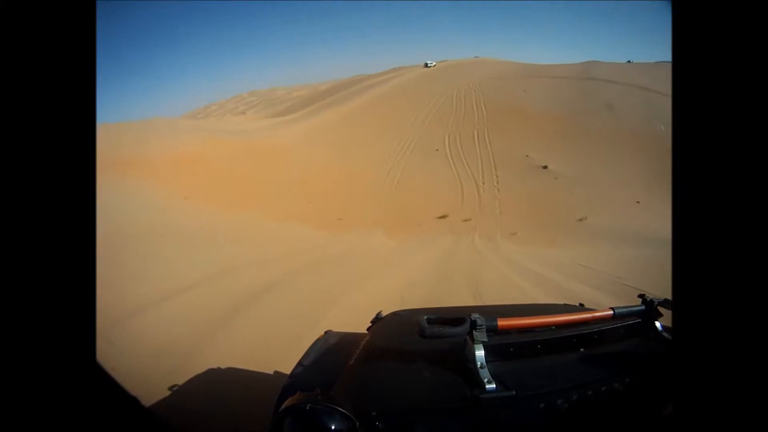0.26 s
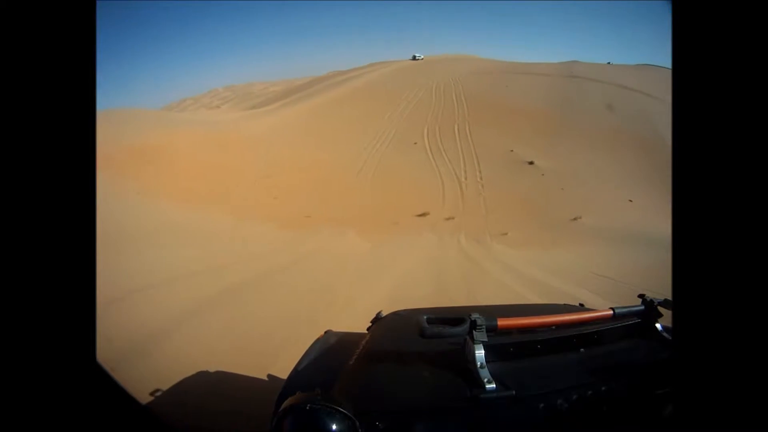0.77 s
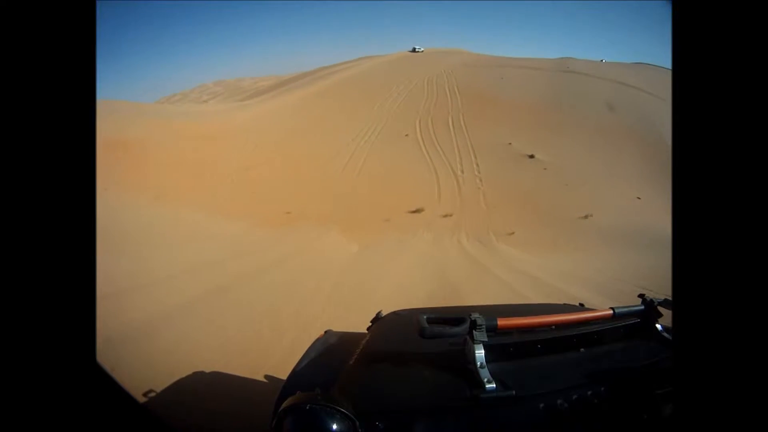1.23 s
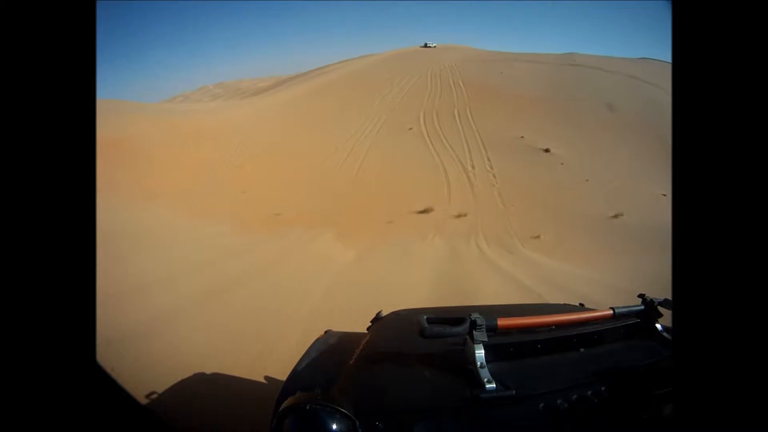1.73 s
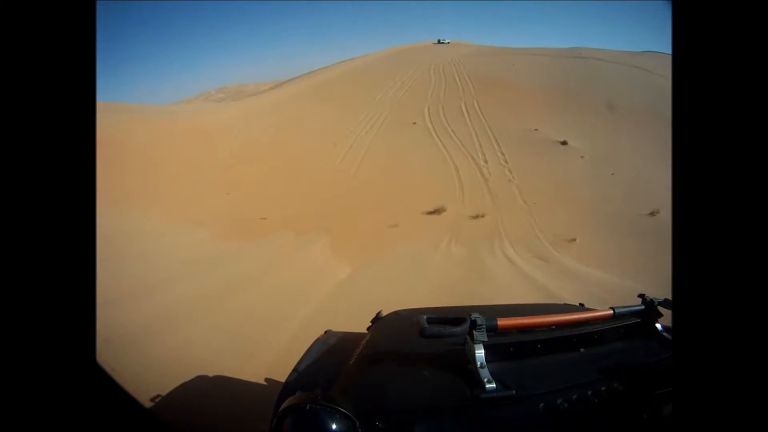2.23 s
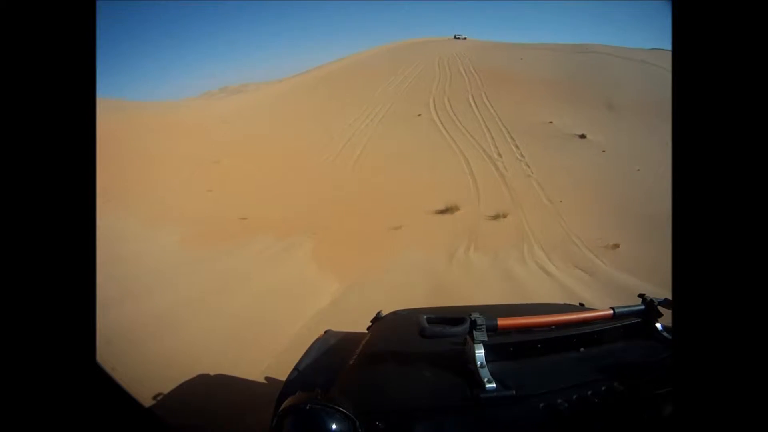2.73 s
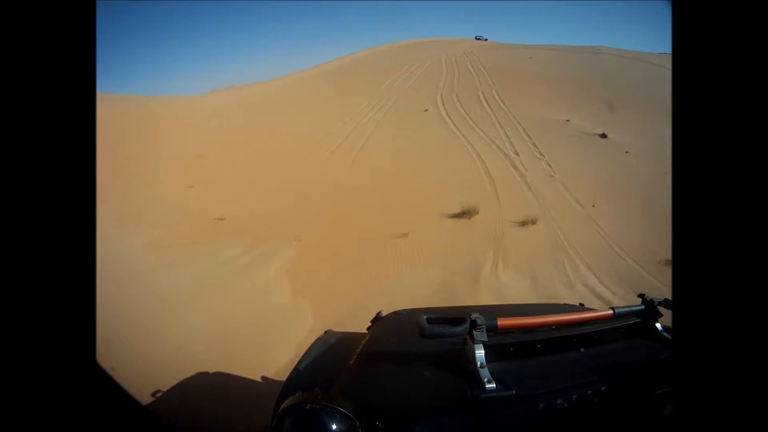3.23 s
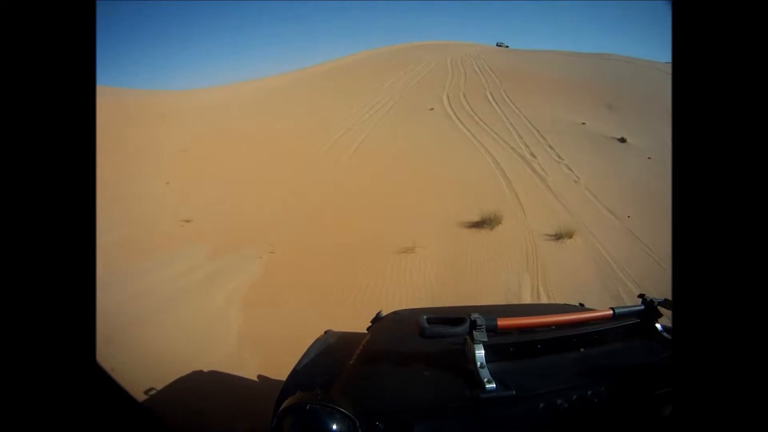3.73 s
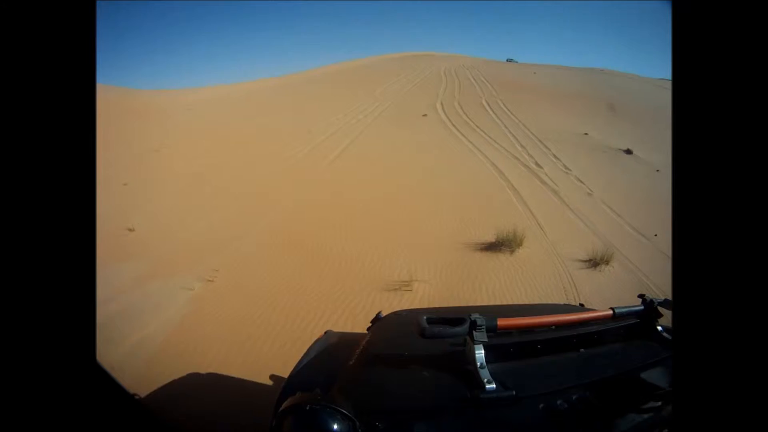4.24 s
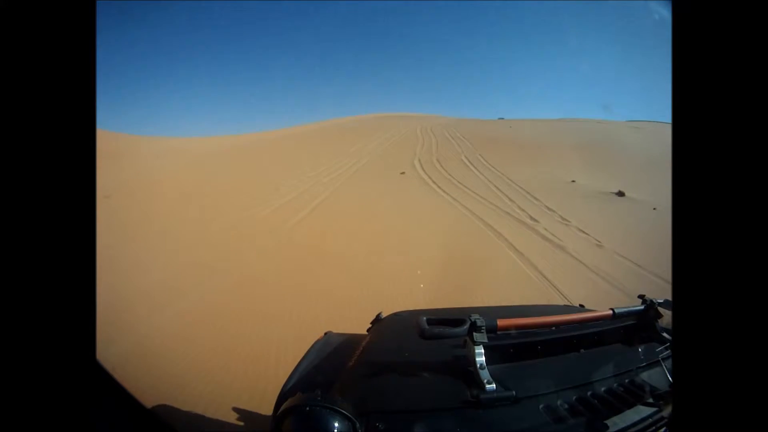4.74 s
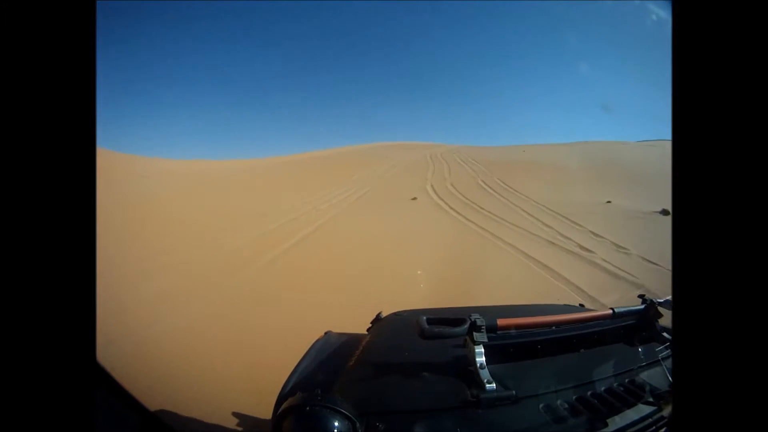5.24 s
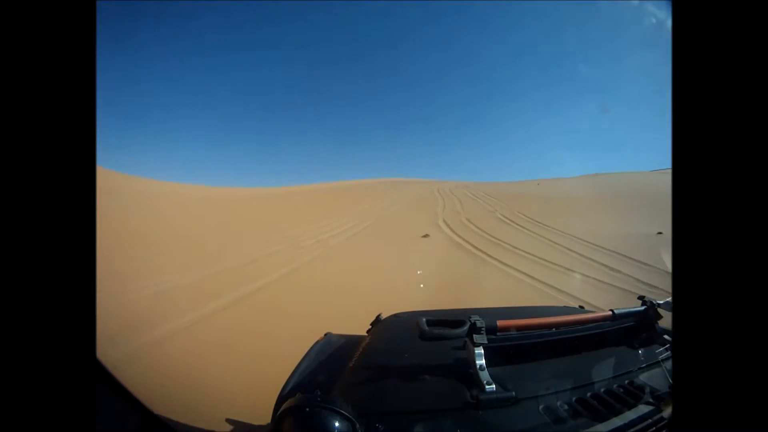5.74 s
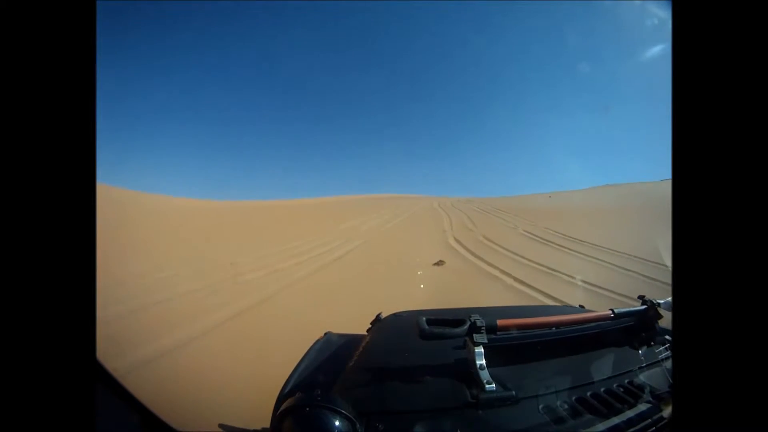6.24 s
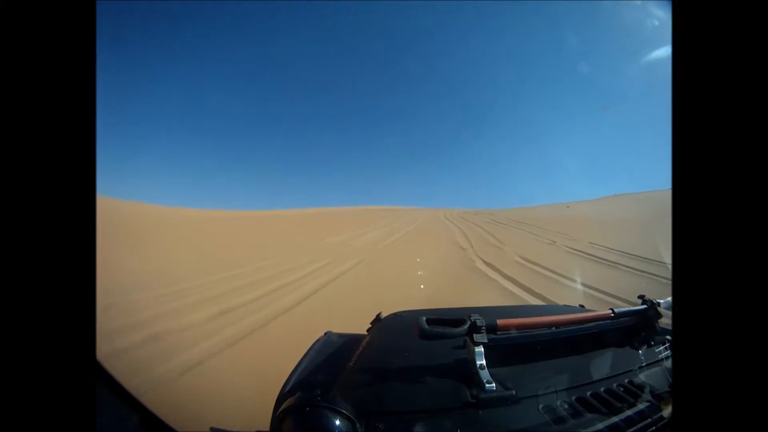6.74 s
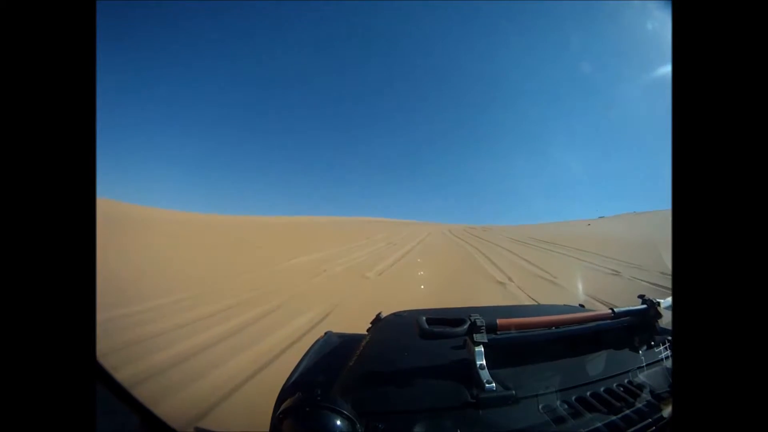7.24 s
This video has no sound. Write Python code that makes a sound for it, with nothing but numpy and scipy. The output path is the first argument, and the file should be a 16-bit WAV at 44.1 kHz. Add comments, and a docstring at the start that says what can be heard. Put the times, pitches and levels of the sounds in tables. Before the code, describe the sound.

A body-mounted microphone on an off-road vehicle catches muffled sand rumble, faint hiss and low wind thuds. A light engine hum wavers underneath. After about four seconds the six-cylinder engine revs up quickly, loose parts rattle in a cluster, and the low booming strengthens; the engine then holds high and loud to the end.

```python
"""Sand dunes: a six-cylinder off-road vehicle cruises over soft sand, then revs hard up a dune. A camera bolted
to its body hears it. Filtered noise makes the sand rumble, panel buzz, hiss and wind. Sine waves make the booms
(the cabin's, then the engine's second order from 6.3 s), the light-throttle hum and the engine; loose parts
knock as ringing hits. The camera samples at 12 kHz and holds each sample, which adds faint mirrored sound
around 12 kHz."""
import sys
import numpy as np
from scipy import signal
from scipy.fft import rfft, irfft, next_fast_len
from scipy.io import wavfile
from scipy.ndimage import uniform_filter1d

SR = 44100
rng = np.random.default_rng(int(sys.argv[2]) if len(sys.argv) > 2 else 0)


def to_wav(sig):
    """Store sig (one row per channel, or 1-D mono) as 16-bit WAV at the path in sys.argv[1].

    Samples outside -1..1 are clipped; the rate is SR.
    """
    pcm = np.clip(np.atleast_2d(sig), -1, 1) * 32767
    pcm = np.round(pcm).astype(np.int16)
    wavfile.write(sys.argv[1], SR, pcm.T)  # frames by channels


N = 330309
T = np.arange(N) / SR  # time in seconds

# The ride over sand: [start_s, rumble_db, body_shake_db]
RIDE = [(0.0, -54, -60.5), (1.13, -47.5, -61), (1.5, -48.5, -59), (2.1, -44.5, -59.5), (3.7, -44, -57),
        (4.15, -48, -57.5), (4.4, -42.5, -55), (4.8, -43, -52), (5.3, -41.5, -51), (5.55, -41, -50.5),
        (5.7, -45.5, -49.5), (6.0, -40.5, -49), (6.3, -42, -48.5), (7.49, -48, -47)]
# Tone of the sand rumble: [pitch_hz, level_db per Hz]
RUMBLE_TONE = [(50, -46), (70, -2), (90, 5), (110, 0), (140, 1.5), (200, 3.5), (270, -5.5), (340, -13.5),
               (500, -48.5)]
# Tone of the shaken body: [pitch_hz, level_db]
BODY_TONE = [(30, 18), (100, -3), (250, 6), (370, -10.5), (600, -19.5), (850, -27.5), (1250, -27),
             (1700, -37.5), (2600, -33), (3600, -41), (5200, -44), (6000, -43)]
# Resonances of the body: [pitch_hz, width_hz, level_db]
BODY_MODES = [(215.5, 34, 10), (554, 80, 6), (750, 200, 10), (978, 76, 16), (1074.7, 96, 19),
              (1475, 78, 10.5), (1984, 97, 9.5), (2266, 290, 15), (3565, 120, 11.5)]
# Tone of the steady background hiss of the camera: [pitch_hz, level_db per Hz]
BACKGROUND_TONE = [(700, -15.5), (1200, -5.5), (2000, -4.5), (3000, -7.5), (4500, -11.5), (6000, -12)]
# One narrow resonance in that hiss: [pitch_hz, width_hz, level_db]
BACKGROUND_MODE = [(1934, 56, 7.8)]
# Wind on the microphone, before its random swells: [start_s, thud_db, flutter_db]
GUSTS = [(0.0, -51.5, -38.5), (0.43, -39, -41), (1.36, -36.5, -42), (1.46, -50, -49.5), (2.35, -40, -34),
         (4.12, -45, -44.5), (4.33, -26.5, -35), (4.64, -28.5, -33), (4.76, -38, -34), (4.9, -26, -38),
         (5.07, -32, -22), (5.38, -36, -39), (5.59, -48, -33), (5.73, -33, -37), (6.26, -49, -42),
         (6.37, -34, -35), (6.51, -40, -49), (6.57, -45, -43), (6.92, -26.5, -39), (7.4, -28, -39)]
# Tone of thuds and flutter: [pitch_hz, level_db per Hz]
WIND_TONE = [(7, -14), (13, -3), (19, 0), (25, -6), (32, -8), (43, -6), (55, -5), (66, -5)]
# Booms: [start_s, hold_s, pitch_hz, rms_level_db]; the cabin booms until 6.2 s, and the rows from 6.3 s are the
# engine's second order, near 85 Hz
BOOMS = [(0.178, 0.11, 79.95, -40.5), (0.613, 0.041, 90, -39.5), (0.693, 0.37, 76.5, -39),
         (1.497, 0.047, 77.5, -43.5), (1.692, 0.13, 72.3, -39), (1.98, 0.12, 77, -40),
         (2.249, .08, 77.3, -39.5), (2.449, .12, 76.9, -39), (2.75, 0.15, 77.5, -36),
         (3.08, 0.045, 69.85, -38.5), (3.202, .07, 77.2, -30.5), (3.46, .18, 74.3, -35),
         (3.722, 0.089, 76.7, -30), (3.95, 0.26, 78.7, -36.5), (4.307, .02, 77.74, -29),
         (4.468, .19, 79.43, -24.5), (4.7, .04, 92, -27), (4.922, .09, 73.14, -31),
         (5.12, 0.021, 75.3, -26), (5.25, 0.04, 79.8, -28.5), (5.365, .1, 80.2, -31),
         (5.516, 0.14, 69.9, -31), (5.739, 0.084, 69.3, -20.5), (5.981, 0.14, 76, -33.5),
         (6.205, .02, 74.74, -30), (6.31, .1, 83.35, -24), (6.43, .2, 84, -21), (6.661, .15, 85.06, -23.5),
         (6.86, 0.081, 85.76, -22), (7.0, 0.14, 84.6, -25.5), (7.217, 0.028, 80.6, -31.5),
         (7.384, .09, 86.5, -24)]
# Loose parts knock: [start_s, peak_level_db of the ring, hardness_db per octave]
KNOCKS = [(0.164, -45, 3), (0.3644, -49, 1), (1.038, -34, -2.5), (1.7918, -44.5, -4), (2.0981, -45.5, -1),
          (2.1306, -45.5, -2), (2.3679, -49, 8), (3.9594, -51, 8), (4.4846, -47, -3), (4.5581, -38, -2),
          (4.6026, -41, -5), (4.6487, -40.5, -3), (4.8144, -43, 6), (4.8448, -46, 8), (4.8654, -49.5, -3),
          (4.9015, -48, 0), (4.9153, -37, -1), (4.956, -43, 5), (4.9744, -41, 3), (4.9781, -47, 8),
          (5.0584, -46, 2), (5.22, -48, 9), (5.3802, -42.5, -4), (5.4782, -36, -13), (5.6475, -43, -3),
          (5.6623, -44, 9), (5.682, -39.5, 3), (5.7793, -47, 11), (5.89, -46, 0), (5.9195, -42, 6),
          (6.2103, -46, 2), (6.5328, -48, 1), (6.6668, -39, -5), (6.8179, -51, 2)]
# Ringing of a knocked part: [pitch_hz, level_db, t60_s (time to fall 60 dB)]
RING = [(610, -6.5, 0.027), (1104, -6, 0.037), (1910, -6, 0.023), (2213, -2.5, 0.074), (2350, 4, 0.032),
        (2810, -4.5, 0.04), (3350, -16, 0.0079), (4500, -21, .006), (5300, -11, 0.0035)]
# Light-throttle hum: [start_s, pitch_hz, rms_level_db]
HUM = [(0.5, 124.2, -66), (0.8, 128, -51), (1.6, 128.6, -46), (1.95, 121, -49.5), (2.06, 138.6, -39.5),
       (2.2, 140, -55), (2.3, 138.1, -39.5), (2.55, 138, -47), (3.4, 150, -44.5), (4.2, 144.3, -50.5)]
# Engine under load, before an overall trim: [start_s, level_db]
REV = [(4.25, -74), (4.4, -57), (4.52, -58), (4.65, -56), (4.8, -58.5), (5.03, -51.5), (5.21, -54),
       (5.34, -46), (5.44, -50), (5.55, -44), (5.74, -46), (5.86, -45.5), (6.1, -46), (6.35, -46.5),
       (7.49, -51)]
# Engine speed: [start_s, four-stroke cycles per second]
CYCLE = [(4.25, 18.42), (4.5, 21.49), (5.25, 29.53), (5.55, 35.73), (5.7, 37.47), (6.0, 39.46),
         (6.15, 41.47), (6.3, 42.37), (6.5, 42.35), (6.75, 43.06), (7.49, 43.4)]
# Engine orders whose level changes while the revs climb: [multiple of the cycle, level_db, extra_level_db]
CLIMB_ORDERS = [(4, -7, -7.5), (5, -14.5, -1.5), (6, -13.5, 10), (7, -23, 15), (8, 0, -12.5), (12, -12, 14),
                (28, -17.5, 7.5), (30, -18, 6.5), (37, -18, 7)]
# Engine orders with a level of their own: [multiple of the cycle, level_db]; six firings a cycle
PLAIN_ORDERS = [(9, -8.5), (10, -11), (11, -7.5), (13, -3.5), (14, -10.5), (15, -10), (16, -21), (17, 1.5),
                (18, -2), (19, -10.5), (20, -8), (21, -27), (22, -4.5), (23, -8), (24, -7), (25, -25)]
# What the cabin and mount let through of the engine: [pitch_hz, level_db]
ENGINE_PATH = [(60, 34.5), (250, 10.5), (370, -4.5), (600, -1.5), (850, -12.5), (1250, -9), (1700, -11)]
# Resonances on that path: [pitch_hz, width_hz, level_db]
PATH_MODES = [(216.1, 31.5, 15.5), (309, 48, 6.5), (588, 33, 10), (745, 39, 4.5), (998, 62, 17.5),
              (1084, 34, 24.5), (1407, 42, 18.5)]
# More resonances and dips of the engine path, heard in all orders: [pitch_hz, width_hz, level_db]
MORE_PATH_MODES = [(96, 20, 16.5), (127, 36, -11), (169.5, 7.3, 9.5), (193.5, 17, -12.5), (253.4, 44, 5),
                   (276.2, 7, 8), (315.4, 18, 5), (371, 32, -7)]

# Hiss level at a calm ride, dB of hiss per dB of shake, and the shake that counts as calm
HISS_DB, HISS_GROWTH, CALM_DB = -73.5, 1.81, -59
BACKGROUND_DB, GUST_SWELL_DB = -63.5, 4
BOOM_RISE_S, BOOM_FALL_S, BOOM_WAVER = 0.03, 0.057, 0.011  # waver is a share of the pitch
MURMUR_DB, MURMUR_HZ = 11.5, 79.2  # level over the body shake; pitch
RASP_DB, RASP_S = -16.5, 0.018  # level at zero hardness; fading time
TICKS_PER_S, TICK_DB = 6.5, 1  # faint chance knocks; their lowest peak over the body shake
HUM_LOOSENS_S, HUM_WAVER, HUM_LOOSE_WAVER = 2.5, 0.0098, 0.0791  # wavers are shares of the pitch
FULL_CLIMB_HZ_PER_S = 6.6  # rise in engine cycles that counts as a full climb
HIGH_ORDER_DB, HIGH_CLIMB_DB = -20.5, 2.5  # level of further high orders; extra at a full climb
LOAD_TRIM_DB = -4.5
CAMERA_HZ, TOP_HZ, STOP_S = 12000, 15280, 0.01  # sampling rate, top edge, fade at the end


def undb(db):
    """Turns decibels into a plain gain."""
    return 10 ** (np.asarray(db) / 20)


def unit(x):
    """Scales a sound to an rms level of 1."""
    return x / np.sqrt(np.mean(x ** 2))


def curves(table):
    """Joins a table's columns by straight lines in time."""
    s, *columns = np.transpose(table)
    return [np.interp(T, s, column) for column in columns]


def fade(table, seconds):
    """Stays at 1 inside the table's time span and ramps to 0 outside it."""
    rise = np.clip(1 + (T - table[0][0]) / seconds, 0, 1)
    fall = np.clip(1 + (table[-1][0] - T) / seconds, 0, 1)
    return rise * fall


def colour(x, points, modes=(), lo_hz=1, hi_hz=1e5):
    """Shapes the tone of x by level points and resonances, between two edges."""
    pad = 4096  # mirrored samples at both ends
    size = next_fast_len(N + 2 * pad)
    f = np.arange(size // 2 + 1) * SR / size + 1e-3  # the small offset avoids log(0)
    hz, db = np.transpose(points)
    level_db = np.interp(np.log(f), np.log(hz), db)
    for centre, width, peak_db in modes:
        level_db = level_db + peak_db / (1 + (2 * (f - centre) / width) ** 2)
    edges = 1 / np.sqrt((1 + (lo_hz / f) ** 12) * (1 + (f / hi_hz) ** 12))
    spectrum = rfft(np.pad(x, pad, "reflect"), size)
    return irfft(spectrum * undb(level_db) * edges, size)[pad:pad + N]


def walk(rate):
    """Wanders at random: levels picked about `rate` times a second, smoothed twice, spread near 1."""
    k = int(SR / rate)
    steps = np.repeat(rng.standard_normal(N // k + 1), k)
    return 1.3 * uniform_filter1d(uniform_filter1d(steps, k), k)[:N]


def noise():
    """Plain white noise."""
    return rng.standard_normal(N)


def sweep(hz):
    """A sine wave whose pitch follows hz: its phase is the running sum of the pitch."""
    return np.sin(2 * np.pi * np.cumsum(hz) / SR)


def engine_turn(cycle):
    """Phase of the four-stroke cycle, with a slight unevenness in speed."""
    return 2 * np.pi * np.cumsum(cycle * (1 + 0.0015 * walk(12))) / SR


def ride(turn):
    """Sand rumbles in the chassis while panels buzz and hiss in step with the engine cycle."""
    rumble_db, shake_db = curves(RIDE)
    rumble = unit(colour(noise(), RUMBLE_TONE)) * undb(rumble_db + 1.36 * walk(9))
    throb = 1 + 0.058 * np.sin(turn) + 0.059 * np.sin(2 * turn + 0.64)
    jolt = walk(7)  # shared by buzz and hiss
    buzz_swell = undb(0.43 * jolt + 0.5 * walk(12))
    buzz = unit(colour(noise() * throb * buzz_swell, BODY_TONE, BODY_MODES, lo_hz=340.6, hi_hz=1680))
    hiss_swell = undb(jolt + 1.3 * walk(10) + 0.53 * walk(70))
    hiss = unit(colour(noise() * throb * hiss_swell, BODY_TONE, BODY_MODES, lo_hz=1590))
    hiss_db = HISS_DB + HISS_GROWTH * (shake_db - CALM_DB)
    return rumble + buzz * undb(shake_db) + hiss * undb(hiss_db)


def background_hiss():
    """The camera hisses steadily: noise with a fixed tone and level."""
    return undb(BACKGROUND_DB) * unit(colour(noise(), BACKGROUND_TONE, BACKGROUND_MODE, lo_hz=500))


def wind():
    """Air on the microphone port makes slow thuds and a quicker flutter."""
    out = np.zeros(N)
    thud_db, flutter_db = curves(GUSTS)
    for db, lo, hi in [(thud_db, 5, 23), (flutter_db, 22, 62)]:
        air = unit(colour(noise(), WIND_TONE, lo_hz=lo, hi_hz=hi))
        # evening out the strength makes the gusts push steadily
        steady = unit(air / uniform_filter1d(air ** 2, SR // 8) ** 0.3)
        out = out + undb(db + GUST_SWELL_DB * walk(9)) * steady
    return out


def boom():
    """Each boom swells, holds and dies away, the late ones being the engine's second order; noise keeps the
    cabin murmuring all along."""
    s, hold, hz, db = np.transpose(BOOMS)
    size = np.zeros(N)
    for start, length, gain in zip(s, hold, undb(db)):
        swell = np.exp(-((T - start) / BOOM_RISE_S) ** 2)
        decay = np.exp(-np.maximum(T - start - length, 0) / BOOM_FALL_S)
        size = np.maximum(size, gain * np.where(T < start, swell, decay))
    # apart from the waver, the pitch stays put during a hold and glides to the next boom
    pitch = np.interp(T, np.c_[s, s + hold].ravel(), np.repeat(hz, 2))
    tone = sweep(pitch * (1 + BOOM_WAVER * walk(25)))
    booms = np.sqrt(2) * size * undb(0.72 * walk(14)) * tone
    flat = [(1, 0), (SR, 0)]
    murmur = unit(colour(noise(), flat, lo_hz=MURMUR_HZ * 0.91, hi_hz=MURMUR_HZ * 1.11))
    _, shake_db = curves(RIDE)
    return booms + murmur * undb(shake_db + MURMUR_DB)


def knocks():
    """A knock is a sharp tick, a scatter of weaker ones and a rasp; hard contact rings upper modes more."""
    out = np.zeros(N)
    t = np.arange(4096) / SR
    short_t = t[:2048]
    when, size, hard = rng.random((int(TICKS_PER_S * N / SR), 3)).T
    when = when * N / SR
    ride_s, _, shake_db = np.transpose(RIDE)
    faint_db = np.interp(when, ride_s, shake_db) + TICK_DB + 6 * size
    hits = np.r_[KNOCKS, np.c_[when, faint_db, 4 * hard - 2]]
    chance = rng.standard_normal((len(hits), 2, 2048))
    for (s, db, hard_db), (scatter, rasp) in zip(hits, chance):
        ring = np.zeros(len(t))
        for hz, mode_db, t60 in RING:
            gain = undb(mode_db + hard_db * np.log2(hz / 2300))
            ring += gain * np.sin(2 * np.pi * hz * t) * 1000.0 ** (-t / t60)
        contact = scatter * undb(-30) * np.exp(-short_t / 0.008)
        contact[0] = 1  # the sharp first tick
        hit = signal.fftconvolve(ring, contact)
        hit = hit / np.abs(hit).max()
        hit[:2048] += rasp * undb(RASP_DB + hard_db) * np.exp(-short_t / RASP_S)
        i = int(s * SR)
        out[i:i + len(hit)] += (undb(db) * hit)[:N - i]
    return out


def hum():
    """At light throttle one tone wavers in pitch and level; its pitch wavers more after 2.5 s."""
    hz, db = curves(HUM)
    waver = np.where(T < HUM_LOOSENS_S, HUM_WAVER, HUM_LOOSE_WAVER)
    tone = sweep(hz * (1 + waver * walk(25)))
    return np.sqrt(2) * undb(db + 2.9 * walk(14)) * tone * fade(HUM, 0.13)


def engine(cycle, turn):
    """The engine sounds at multiples of its cycle, each swelling a little, coloured by cabin and mount."""
    level_db, = curves(REV)
    speed_rise = uniform_filter1d(np.gradient(cycle) * SR, SR // 5)
    climb = np.clip(speed_rise / FULL_CLIMB_HZ_PER_S, 0, 1)

    def order(k, db):
        """One sine at k times the cycle, from a random starting phase."""
        return undb(db) * np.sin(k * turn + 2 * np.pi * rng.random())

    orders = np.zeros(N)
    for k, db, climb_db in CLIMB_ORDERS:
        orders += order(int(round(k)), db + climb_db * climb + 1.6 * walk(13))
    high_db = HIGH_ORDER_DB + HIGH_CLIMB_DB * climb
    high_orders = [(k, high_db) for k in (26, 27, 29, 31, 32, 33, 34, 35, 36)]
    for k, db in [*PLAIN_ORDERS, *high_orders]:
        orders += order(k, db + 1.8 * walk(8))
    load = undb(level_db + LOAD_TRIM_DB) * fade(REV, 0.22)
    return colour(orders * load, ENGINE_PATH, [*PATH_MODES, *MORE_PATH_MODES])


def scene():
    """Adds all sources; the engine cycle also drives the panels."""
    cycle, = curves(CYCLE)
    turn = engine_turn(cycle)
    mix = ride(turn) + background_hiss() + wind() + boom() + knocks() + hum() + engine(cycle, turn)
    return mix[None]  # one channel


def record(dry):
    """The camera dulls the sound, samples at 12 kHz, holds each sample four steps at 48 kHz, cuts the top."""
    dull = signal.sosfilt(signal.butter(8, 5500, fs=SR, output="sos"), dry)
    # both rates are divided by 300 to give whole-number ratios
    slow = signal.resample_poly(dull, CAMERA_HZ // 300, SR // 300, axis=1, padtype="line")
    stairs = np.repeat(slow, 4, axis=1)
    held = signal.resample_poly(stairs, SR // 300, 4 * CAMERA_HZ // 300, axis=1, padtype="line")[:, :N]
    ending = np.clip((T[-1] - T) / STOP_S, 0, 1)
    top_cut = signal.ellip(10, 0.2, 80, TOP_HZ, fs=SR, output="sos")
    return signal.sosfilt(top_cut, held * ending)


dry = scene()
out = record(dry)
to_wav(out)
```